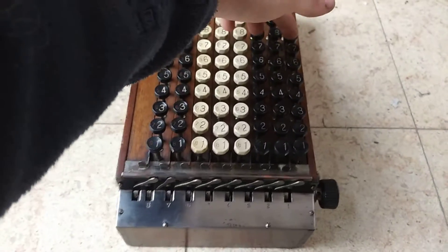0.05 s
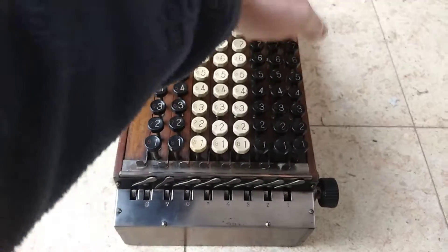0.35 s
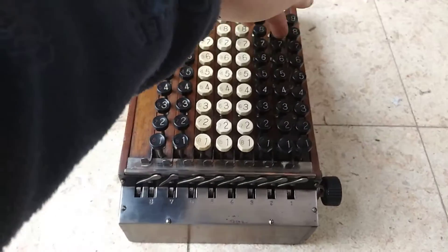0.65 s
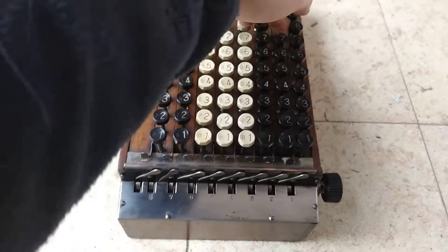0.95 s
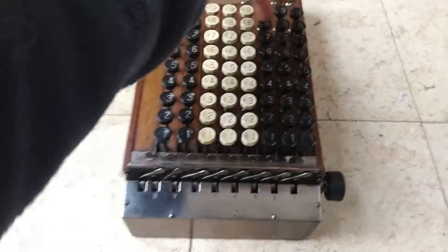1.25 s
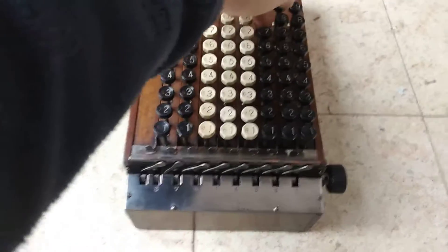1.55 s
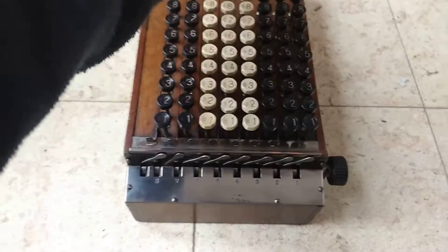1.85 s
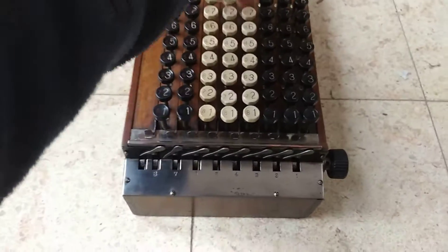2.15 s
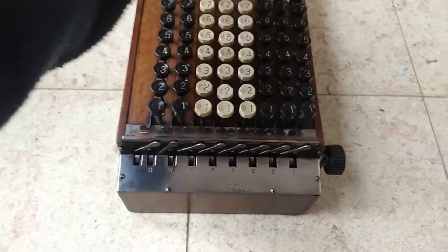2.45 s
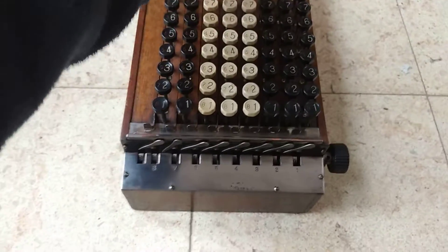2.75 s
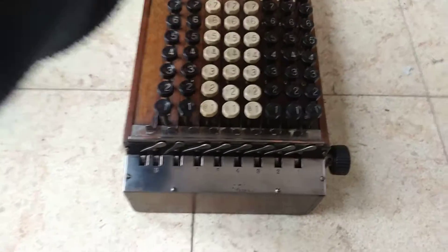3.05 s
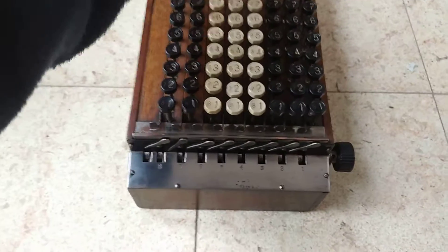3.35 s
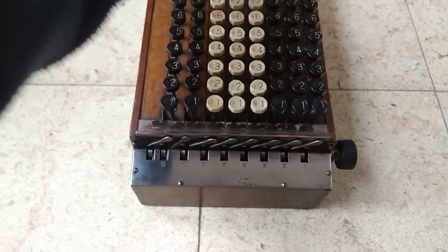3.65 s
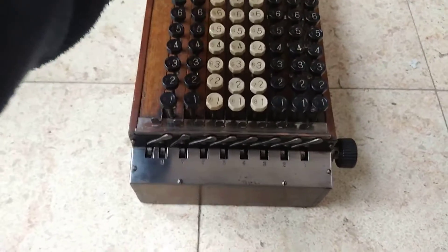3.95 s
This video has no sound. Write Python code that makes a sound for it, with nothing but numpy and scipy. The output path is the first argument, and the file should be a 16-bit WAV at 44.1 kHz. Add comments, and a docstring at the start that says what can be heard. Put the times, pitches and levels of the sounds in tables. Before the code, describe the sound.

Close by, the keys of an old adding machine are pressed and released six times. Each press rasps and clacks; each release snaps a lever back with a brief rattle of springs, echoing lightly in a quiet tiled room.

```python
"""A light knock, then the quick rasp of a ratchet: a key of an old adding machine goes down, close to two
microphones on a tiled floor. The ratchet runs faster, and mostly louder, until the key bottoms; coming
up, pawls tick and the lever slams on its stop, thumping the case and shaking the springs.
Six strokes in all. The small hard room rings after each one, over faint steady air."""
import sys
import numpy as np
from scipy import signal
from scipy.fft import rfft, irfft
from scipy.io import wavfile

SR = 44100
rng = np.random.default_rng(int(sys.argv[2]) if len(sys.argv) > 2 else 0)


def store_wav(level_fs):
    """Save 16-bit WAV to argv[1]."""
    pcm = np.round(np.clip(np.atleast_2d(level_fs), -1, 1) * 32767)
    wavfile.write(sys.argv[1], SR, pcm.T.astype(np.int16))


N = 176400
T = np.arange(N) / SR

# Levels in the tables are relative, ahead of the filters and the room.
# ratchet, key going down: start t/s, end t/s, first tooth level/dB, end level/dB, first tooth gap/s
RATCHET_DOWN = [(0.319, 0.371, -25.5, -20, 0.01), (0.9957, 1.037, -23, -21, 0.01),
                (1.607, 1.683, -22.5, -35.5, 0.0088), (2.232, 2.28, -23, -18, 0.0093),
                (2.886, 2.933, -23, -17, 0.00897), (3.498, 3.525, -21.5, -23, 0.01)]
# ratchet, key coming up: start t/s, end t/s, tooth level/dB, tooth gap/s
RATCHET_UP = [(0.501, .535, -32, 0.0036), (1.179, 1.22, -37.5, 0.0083), (1.772, 1.82, -38, .009),
              (2.403, 2.443, -32.5, .0095), (3.091, 3.142, -27, 0.01), (3.711, 3.787, -31.5, 0.0085)]
# single knocks of keys, pawls and levers: t/s, body level/dB, treble level/dB
PART_KNOCKS = [(0.269, -39, -51), (0.3202, -30.5, -33.5), (0.384, -34, -17), (0.391, -20.5, -18.5),
               (0.479, -36.5, -40), (0.4877, -30, -22), (.508, -27, -45), (.5205, -30.5, -23),
               (0.5499, -32, -16.5), (0.969, -38, -42), (1.039, -24.5, -27.5), (1.046, -31.5, -17),
               (1.051, -17, -15.5), (1.157, -36, -39), (1.1678, -42, -19.5), (1.190, -29.5, -37),
               (1.2264, -22.5, -27), (1.507, -41, -31.5), (1.573, -50, -56), (1.581, -42, -42),
               (1.6349, -17.5, -11), (1.643, -25.5, -12), (1.6475, -16, -11.5), (1.661, -19.5, -16),
               (1.746, -33, -54), (1.753, -32.5, -28), (1.784, -25.5, -23.5), (1.7899, -32, -27),
               (2.125, -50.5, -46), (2.16, -43, -43), (2.199, -33.5, -32), (2.267, -16, -11.5),
               (2.284, -28, -20.5), (2.2985, -22, -18.5), (2.388, -30, -21.5), (2.411, -32, -29),
               (2.415, -34, -28.5), (2.502, -45, -28.5), (2.802, -53.5, -51), (2.811, -37, -19.5),
               (2.845, -37.5, -36), (2.9165, -19, -12), (2.926, -21.5, -12), (3.058, -45, -35),
               (3.0794, -27.5, -17), (3.100, -22, -20.5), (3.463, -36.5, -52), (3.476, -28, -38),
               (3.53, -19, -10.5), (3.542, -18, -10), (3.547, -23.5, -42), (3.663, -33.5, -30),
               (3.677, -32, -23.5), (3.688, -38, -32), (3.712, -41, -28.5), (3.78, -27, -34)]
# lever on its stop: t/s, body level/dB, treble level/dB, thump level/dB, springs level/dB
LEVER_SLAMS = [(0.5357, -16, -9, -53, -22), (1.214, -18, -10, -29.5, -20.5), (1.8175, -18.5, -11, -34, -23),
               (2.4577, -20, -13.5, -62, -41), (3.128, -19.5, -10.5, -27.5, -19),
               (3.764, -16.5, -10, -27, -21)]
# tone of keys and ratchet going down: f/Hz, level/dB
DOWN_TONE = [(50, -33.5), (150, -28.5), (215, -19.5), (300, -10.5), (400, -6), (480, -8), (640, 4.5),
             (800, -2.5), (1000, 0), (1220, -2.5), (1450, -1.5), (1800, -3), (2350, 0.5), (2800, -5.5),
             (3300, -7.5), (3900, -2), (4600, -1.5), (5000, -7), (6200, -2), (7400, -3), (8700, 1.5),
             (10500, -10), (14000, -6)]
# tone of pawls and lever coming up: f/Hz, level/dB
UP_TONE = [(50, -23.5), (150, -17.5), (220, -14), (310, -7), (400, 0), (480, -6), (660, 7.5), (850, -4),
           (1000, 1.5), (1220, -4), (1500, -2.5), (2200, 0.5), (2800, -5), (3600, 0), (4600, 2.5),
           (5000, -5), (6200, 1), (7400, 1.5), (8700, 5.5), (11000, -6), (14000, -7.5)]
# ringing modes of frame and levers: f/Hz, level/dB, t60/s
FRAME_MODES = [(296, -38.5, 0.33), (403, -27, 0.75), (644, -31.5, 0.24), (668.6, -32.5, 1),
               (693, -32.5, 0.2), (937, -43.5, 0.96), (966, -29.5, 0.31), (1485, -24, 0.45),
               (1733, -26.5, 0.45), (2137, -50, 0.56), (2280, -16.5, 0.21), (8440, -29, .12)]
# tone of the shaken springs: f/Hz, level/dB
SPRING_TONE = [(100, -27), (200, -9), (390, 3), (480, 4), (700, 9.5), (1000, 8), (1200, -6), (2200, 4),
               (4500, 3.5), (5100, -7), (7000, 7), (8800, 3.5), (10500, -7.5), (14000, -14)]
# microphone balance, key going down: f/Hz, left minus right level/dB
DOWN_BALANCE = [(60, -4.5), (110, 26.5), (250, 17), (400, 15), (520, -3.5), (700, 1), (1300, 5.5),
                (2300, 6), (3300, -4.5), (4500, 2), (7000, -2), (9000, 8.5), (14000, 4)]
# microphone balance, key coming up: f/Hz, left minus right level/dB
UP_BALANCE = [(60, -1), (110, 12), (250, 14), (400, 13), (520, -0.5), (700, 0.5), (1300, 3.5), (2300, 3.5),
              (3300, -5.5), (4500, 0.5), (7000, -2), (9000, 5), (14000, 5.5)]
# echo of the tiled room: f/Hz, t60/s, level/dB
ROOM_ECHO = [(149, 0.99, -7), (430, 0.61, -8.5), (1013, 0.56, -10), (2650, 0.49, -9.5), (7070, 0.46, -12.5),
             (12700, 0.42, -19.5)]
# steady air of the room: f/Hz, level/dB
AIR_TONE = [(18, -45), (30, -29.5), (109, -6), (156, -17), (201, -8), (274, -16), (424, -13), (4520, -26),
            (5010, -26.5), (14000, -36)]

KEY_HELD_S, KEY_BACK_S = 0.05, 0.25  # the up stroke lies between these times after the key bottoms
BODY_SPLIT_HZ = 2925  # body below, treble above


def ratchet():
    """Teeth click past, faster and faster going down, evenly coming up: t/s, body/dB, treble/dB."""
    speedup_per_s, down_body_db, up_body_db = 15, -7, -6.5
    teeth = []
    for start, end, first_db, end_db, gap in RATCHET_DOWN:
        at = start
        while at < end:
            db = np.interp(at, [start, end], [first_db, end_db])
            teeth.append((at, db + down_body_db, db))
            at += gap / (1 + speedup_per_s * (at - start))
    for start, end, db, gap in RATCHET_UP:
        teeth += [(at, db + up_body_db, db) for at in np.arange(start, end, gap)]
    scatter_db = 0.63 * rng.standard_normal((400, 1))[:len(teeth)]
    return np.array(teeth) - scatter_db * [0, 1, 1]


def contacts(hits, slams):
    """Parts slide briefly, then meet: a short treble crack over a slightly longer knock of the body."""
    body, treble = split_noise("low", shared=1), split_noise("high", shared=0.17)
    times, body_db, _ = np.vstack([hits, slams[:, :3]]).T
    slide = blows(times - 0.0066, body_db - 15.5, rise_s=0.0057, decay_s=0.0094)
    knock = blows(times, body_db, rise_s=0.0014, decay_s=0.0028)
    hit_crack = blows(hits[:, 0], hits[:, 2], rise_s=0.0011, decay_s=0.0023)
    slam_crack = blows(slams[:, 0], slams[:, 2], rise_s=0.00087, decay_s=0.0021)
    crack = np.hypot(hit_crack, slam_crack)
    return np.hypot(knock, slide) * body + np.hypot(crack, slide / 2) * treble


def frame(strikes, shell_db, modes_db):
    """Each key rings the machine a little differently: the shell briefly, the frame in longer modes."""
    t, out = T[:SR], strikes
    stroke = np.searchsorted(np.array(RATCHET_DOWN)[:, 1] + KEY_BACK_S, T)
    for key in range(len(RATCHET_DOWN)):
        shell = diffuse_noise() * fade(t, t60=0.093)
        shell *= amp(shell_db) / np.linalg.norm(shell[0])
        detunes = 1 + 0.0054 * rng.standard_normal(len(FRAME_MODES))
        modes = sum(amp(db + modes_db) * np.sin(2 * np.pi * hz * detune * t) * fade(t, t60)
                    for (hz, db, t60), detune in zip(FRAME_MODES, detunes))
        out = out + ring(strikes * (stroke == key), shell + modes)
    return out


def springs(slams):
    """The return springs shiver just after each slam, in a crowd of narrow resonances."""
    lag_s, t60_s, spacing_hz = 0.0076, 0.32, 22
    shiver = blows(slams[:, 0] + lag_s, slams[:, 4] - 7.5, rise_s=0.0084, decay_s=t60_s / np.log(1000))
    centres = np.arange(0, SR / 2, spacing_hz)
    peaks_db = 3 * rng.standard_normal(len(centres))
    resonances = amp(np.interp(np.fft.rfftfreq(N, 1 / SR), centres, peaks_db))
    wires = irfft(rfft(mic_noise(shared=0.17)) * resonances)
    return colour(shiver * wires / wires.std(), SPRING_TONE)


def case_thumps():
    """Each slam rocks the case for about one slow cycle, almost all of it on the left microphone."""
    case_hz, decay_s, right_db = 102.6, 0.005, -24.5
    out = 0
    for at, _, _, db, _ in LEVER_SLAMS:
        t = np.maximum(T - at, 0)
        out = out + amp(db + 2.5) * np.sin(2 * np.pi * case_hz * t) * np.exp(-t / decay_s)
    return out * amp([[0], [right_db]])


def at_microphones(sound, balance):
    """The close machine and its room echo reach the two microphones unevenly."""
    left, right = sound + tiled_room(sound)
    return np.vstack([colour(left, balance, share=0.5), colour(right, balance, share=-0.5)])


def tiled_room(sound):
    """Hard surfaces nearby return a diffuse echo, each half octave with its own decay."""
    t, hz = T[:SR], np.fft.rfftfreq(SR, 1 / SR)
    spectrum, echo = rfft(diffuse_noise()), 0
    edges_hz = 60 * 2 ** (np.arange(18) / 2)
    for low, high in zip(edges_hz, edges_hz[1:]):
        centre = np.sqrt(low * high)
        t60, db = along(centre, ROOM_ECHO), along(centre, ROOM_ECHO, column=2)
        band = irfft(spectrum * ((hz >= low) & (hz < high)))
        unit_energy = np.sqrt(2 * np.log(1000) / (t60 * SR))
        echo = echo + band * fade(t, t60) * unit_energy * amp(db)
    build_up = np.minimum(t / 0.0027, 1) ** 2
    return ring(sound, echo * build_up)


def room_air(level_db):
    """Faint steady room tone behind the machine."""
    air = colour(mic_noise(shared=0.083), AIR_TONE)
    return air / air.std() * amp(level_db)


def blows(times, levels_db, rise_s, decay_s):
    """Envelope of blows that rise quickly and die away, summed in power."""
    power = np.zeros(N)
    for at, db in zip(times, levels_db):
        span = slice(int(at * SR) + 1, int((at + 10 * decay_s) * SR))
        t = T[span] - at
        shape = (1 - np.exp(-t / rise_s)) * np.exp(-t / decay_s)
        power[span] += (amp(db) * shape / shape.max()) ** 2
    return np.sqrt(power)


def mic_noise(shared):
    """Noise at the two microphones, with a share of its power common to both."""
    noise = rng.standard_normal((3, N))
    return np.sqrt(shared) * noise[:1] + np.sqrt(1 - shared) * noise[1:]


def split_noise(side, shared):
    """Unit-level noise on the low (body) or high (treble) side of the split."""
    crossover = signal.butter(4, BODY_SPLIT_HZ, side, fs=SR, output="sos")
    noise = signal.sosfilt(crossover, mic_noise(shared))
    return noise / noise.std()


def diffuse_noise(alike_below_hz=900):
    """One second of noise at both microphones, alike in the lows."""
    spectra = rfft(rng.standard_normal((3, SR)))
    alike = np.exp(-(np.fft.rfftfreq(SR, 1 / SR) / alike_below_hz) ** 2)
    return irfft(np.sqrt(alike) * spectra[:1] + np.sqrt(1 - alike) * spectra[1:])


def colour(sound, table, share=1):
    """Minimum-phase filter shaped by a table of f/Hz, level/dB; share scales the decibels."""
    size = 4096
    gain = amp(share * along(np.fft.rfftfreq(size, 1 / SR), table))
    cepstrum = irfft(np.log(gain))
    cepstrum[1:size // 2] *= 2
    cepstrum[size // 2 + 1:] = 0
    return ring(sound, irfft(np.exp(rfft(cepstrum))))


def ring(sound, response):
    """Pass a sound through an impulse response."""
    return signal.fftconvolve(np.atleast_2d(sound), np.atleast_2d(response), axes=1)[:, :N]


def along(hz, table, column=1):
    """Read a column of a table on a log-frequency axis."""
    table = np.array(table)
    return np.interp(np.log(hz + 1), np.log(table[:, 0]), table[:, column])


def fade(t, t60):
    """Decay by 60 dB in t60 seconds."""
    return np.exp(-np.log(1000) * t / t60)


def amp(db):
    """Decibels to gain."""
    return 10 ** (np.asarray(db) / 20)


def scene():
    """Six strokes down and up, close to two microphones in a small hard room."""
    hits, slams = np.vstack([ratchet(), PART_KNOCKS]), np.array(LEVER_SLAMS)
    since_bottom = hits[:, :1] - np.array(RATCHET_DOWN)[:, 1]
    rising = np.any((since_bottom > KEY_HELD_S) & (since_bottom < KEY_BACK_S), axis=1)
    down_strikes = colour(contacts(hits[~rising], slams[:0]), DOWN_TONE)  # no slams going down
    down = frame(down_strikes, shell_db=0, modes_db=-39.5)
    up_strikes = colour(contacts(hits[rising], slams), UP_TONE)
    up = frame(up_strikes, shell_db=-5.5, modes_db=-32) + springs(slams)  # slams shake the frame most
    air = room_air(level_db=-67)
    return at_microphones(down, DOWN_BALANCE) + at_microphones(up, UP_BALANCE) + case_thumps() + air


def record(dry):
    """The recorder rounds the loudest peaks and cuts the top."""
    ceiling, top_hz = 0.72, 14350
    rounded = ceiling * np.tanh(dry / ceiling)
    return signal.sosfilt(signal.ellip(8, 0.2, 70, top_hz, fs=SR, output="sos"), rounded)


dry = scene()
out = record(dry)
store_wav(out)
```